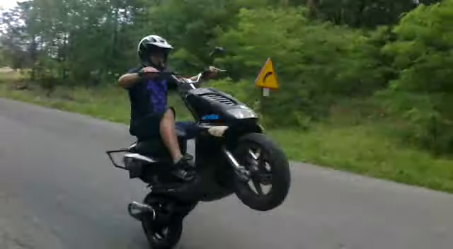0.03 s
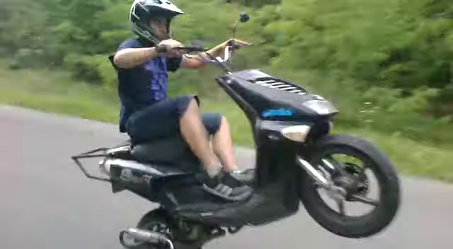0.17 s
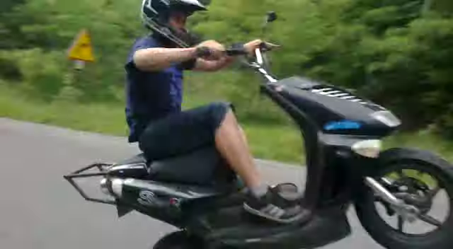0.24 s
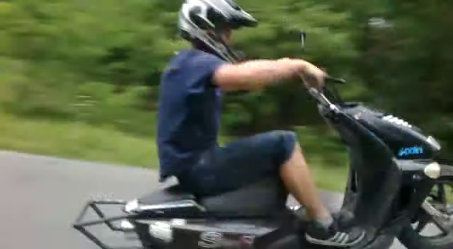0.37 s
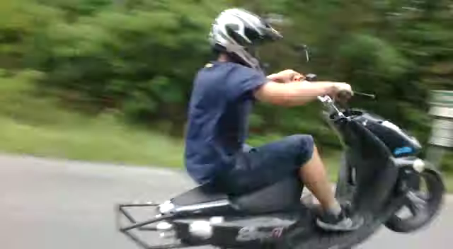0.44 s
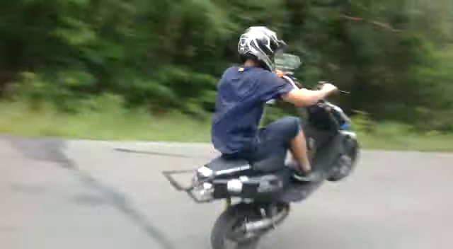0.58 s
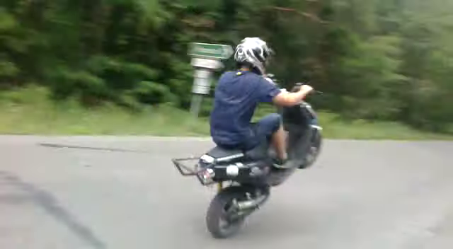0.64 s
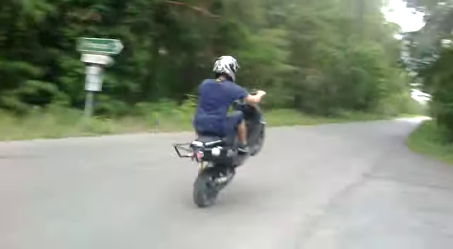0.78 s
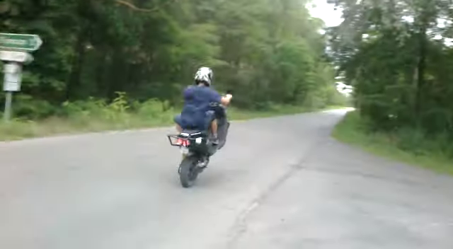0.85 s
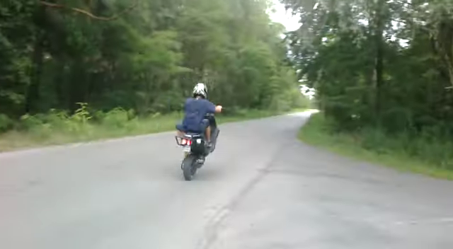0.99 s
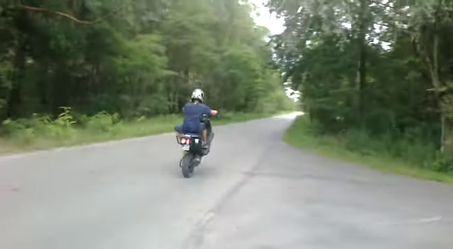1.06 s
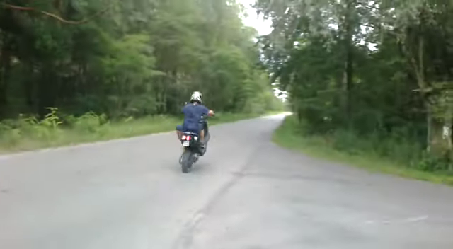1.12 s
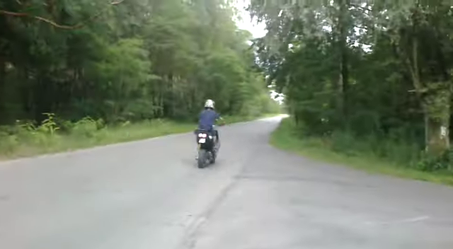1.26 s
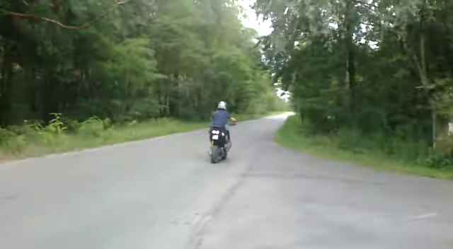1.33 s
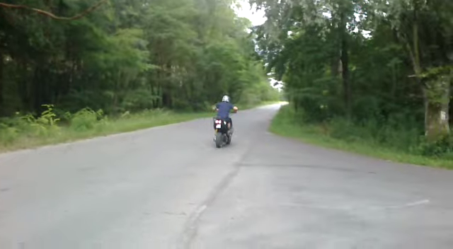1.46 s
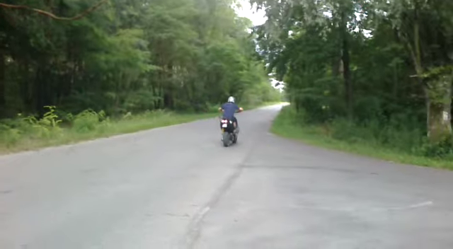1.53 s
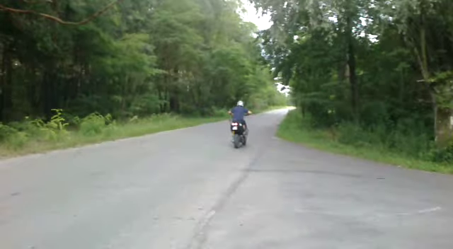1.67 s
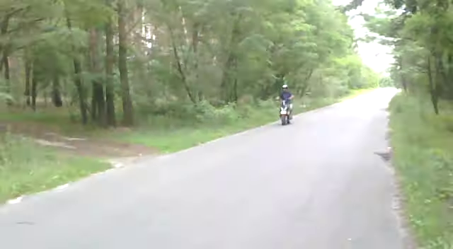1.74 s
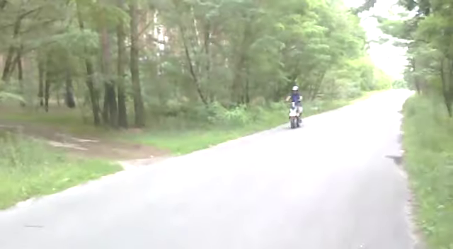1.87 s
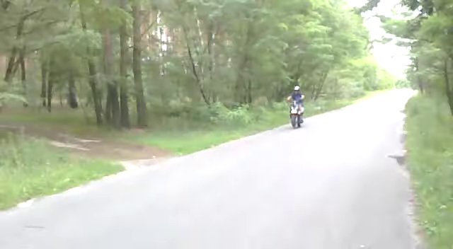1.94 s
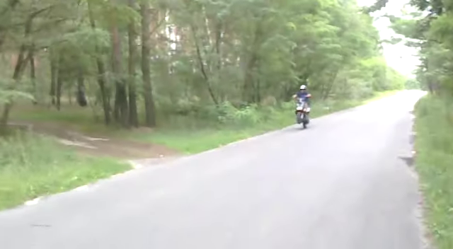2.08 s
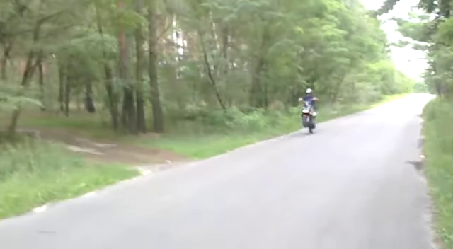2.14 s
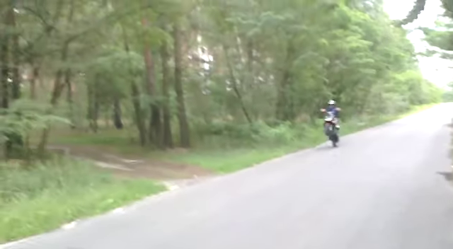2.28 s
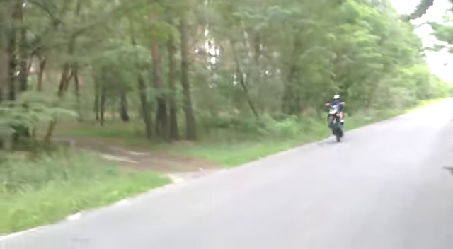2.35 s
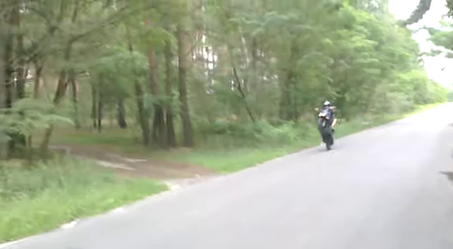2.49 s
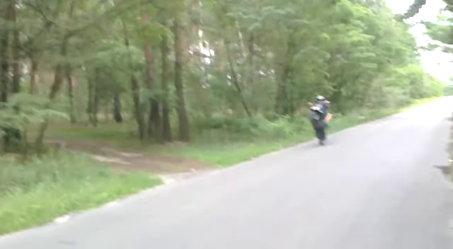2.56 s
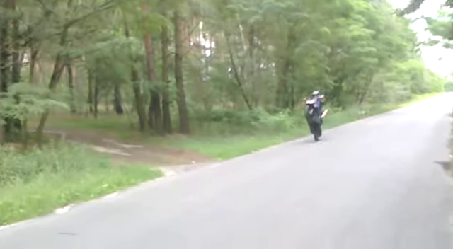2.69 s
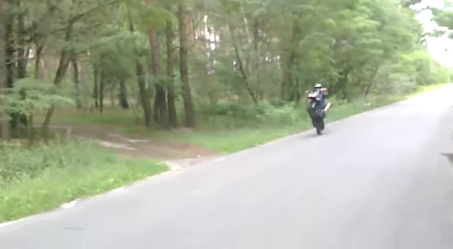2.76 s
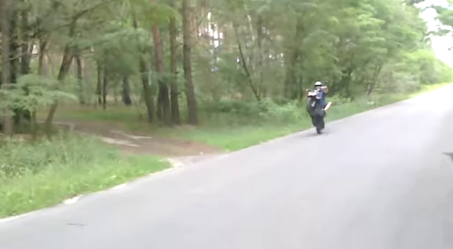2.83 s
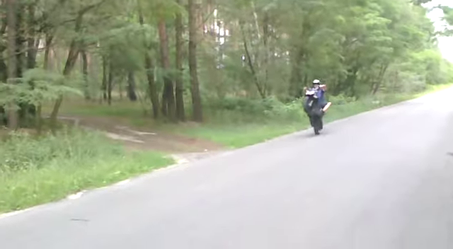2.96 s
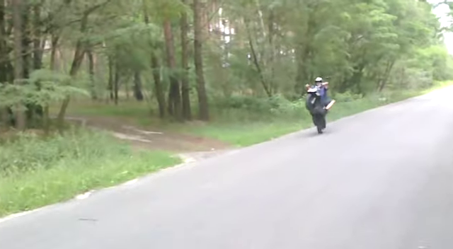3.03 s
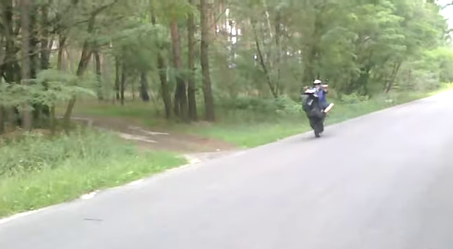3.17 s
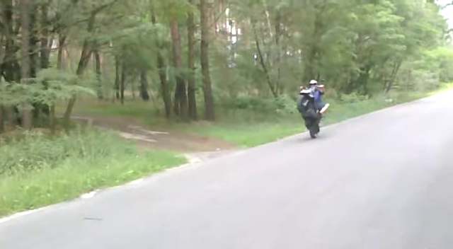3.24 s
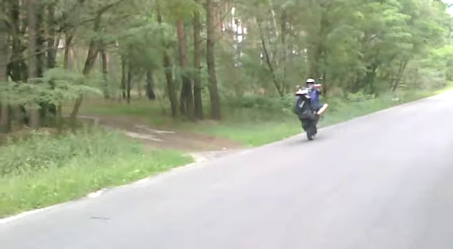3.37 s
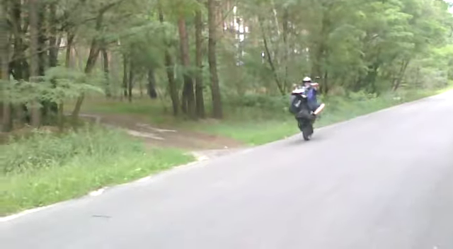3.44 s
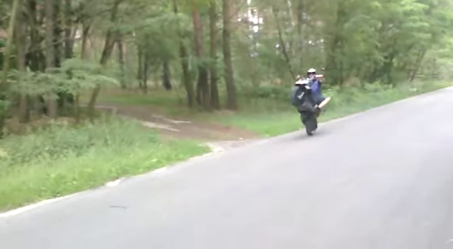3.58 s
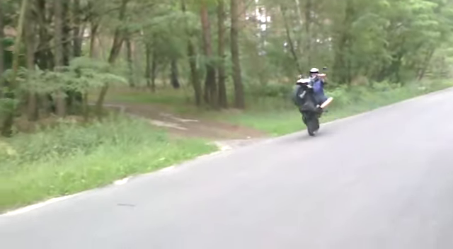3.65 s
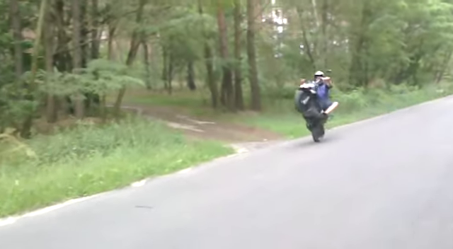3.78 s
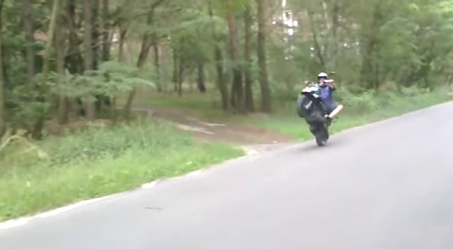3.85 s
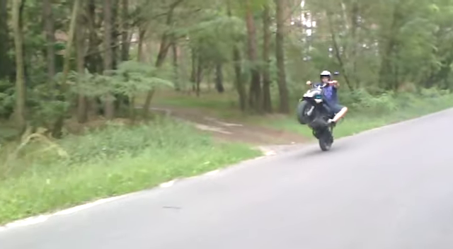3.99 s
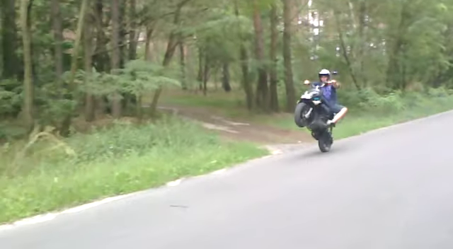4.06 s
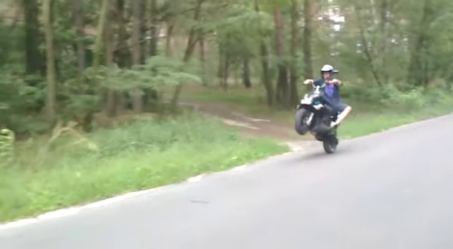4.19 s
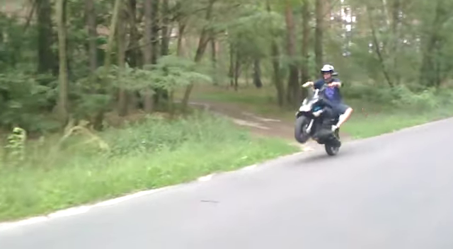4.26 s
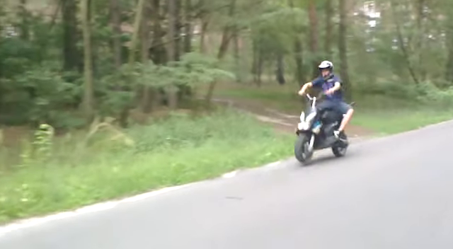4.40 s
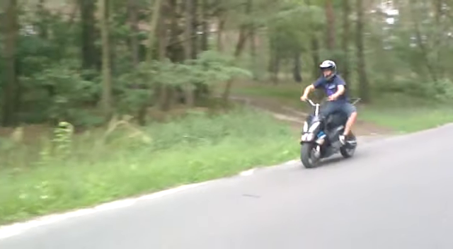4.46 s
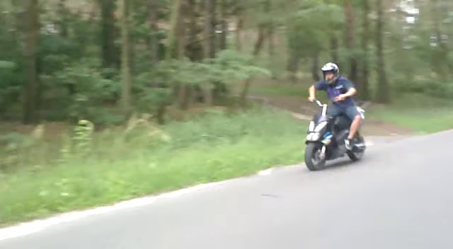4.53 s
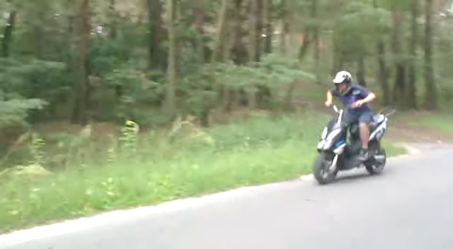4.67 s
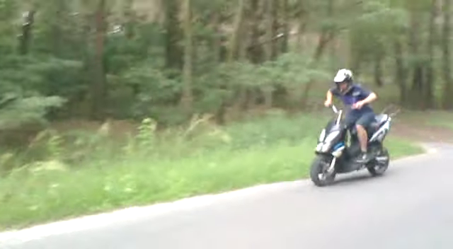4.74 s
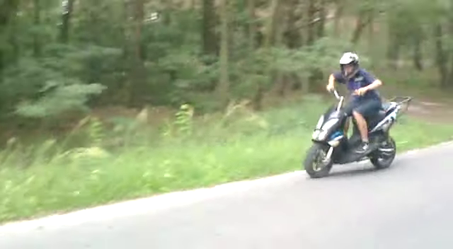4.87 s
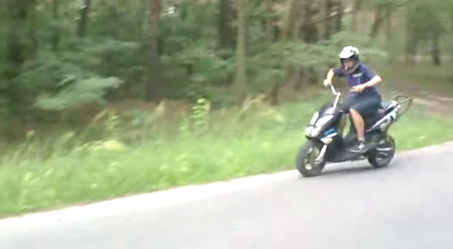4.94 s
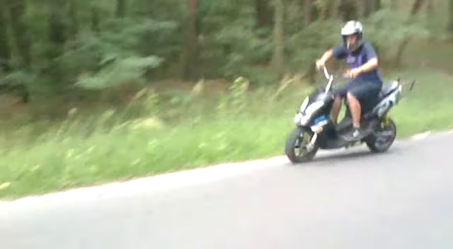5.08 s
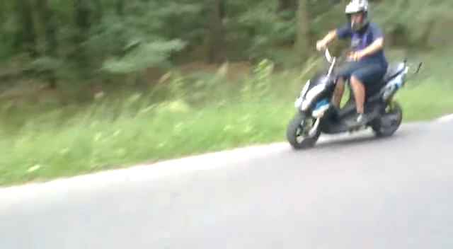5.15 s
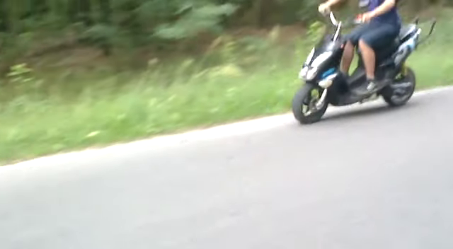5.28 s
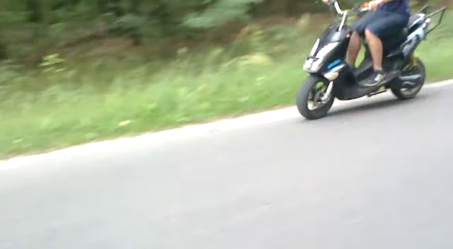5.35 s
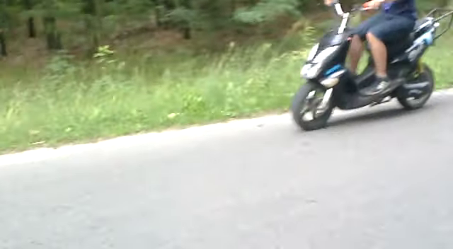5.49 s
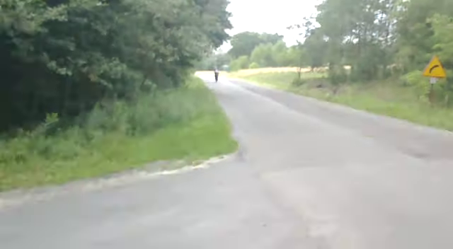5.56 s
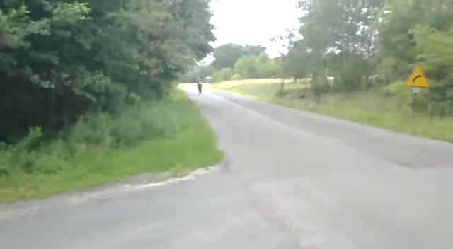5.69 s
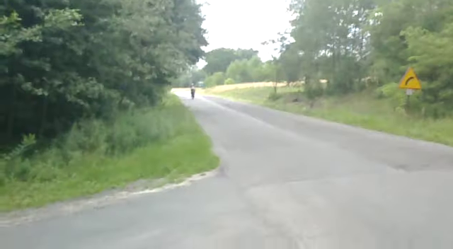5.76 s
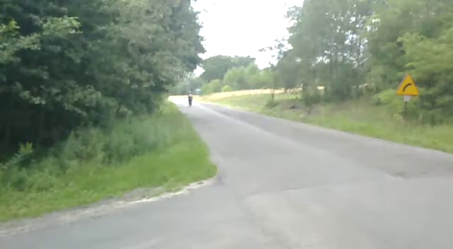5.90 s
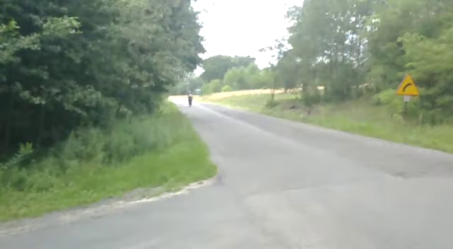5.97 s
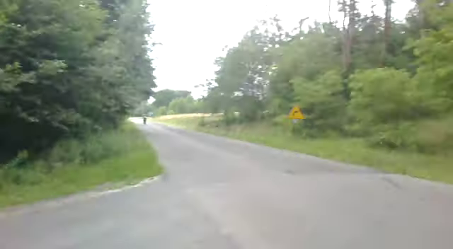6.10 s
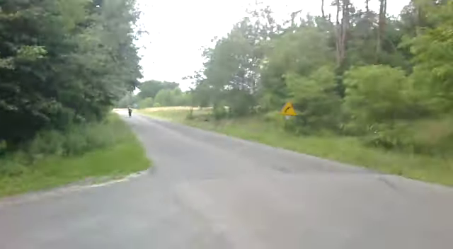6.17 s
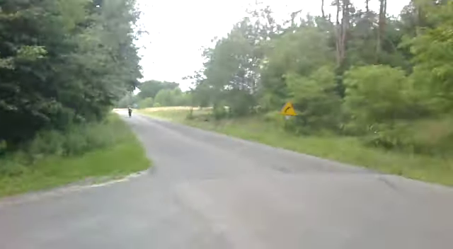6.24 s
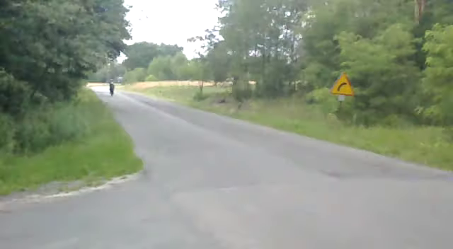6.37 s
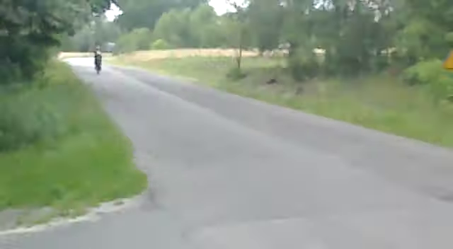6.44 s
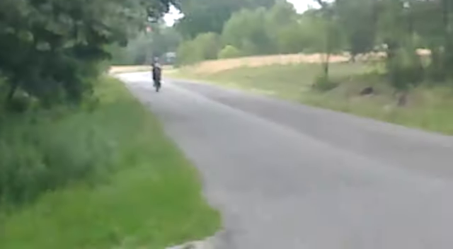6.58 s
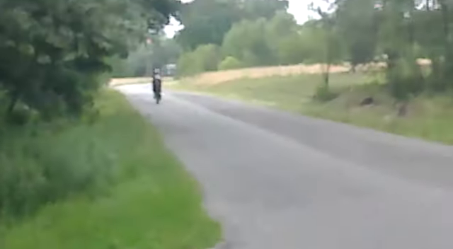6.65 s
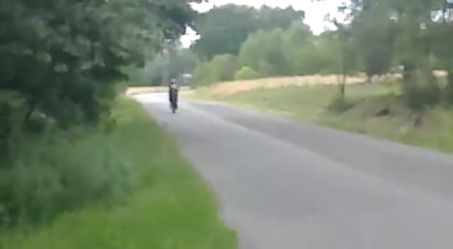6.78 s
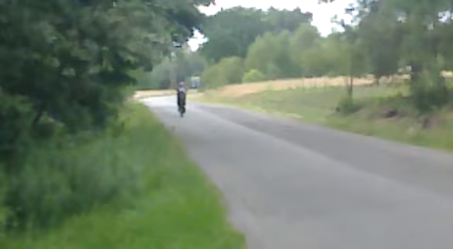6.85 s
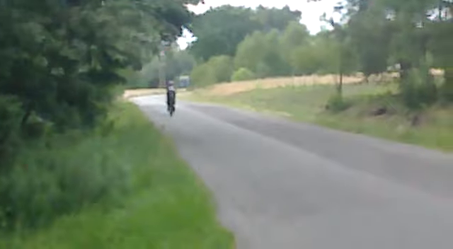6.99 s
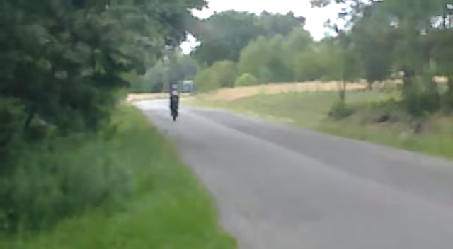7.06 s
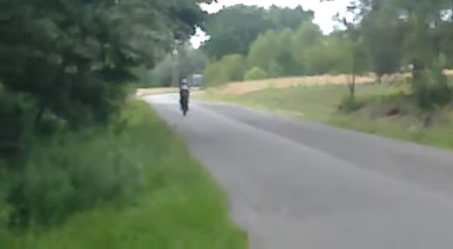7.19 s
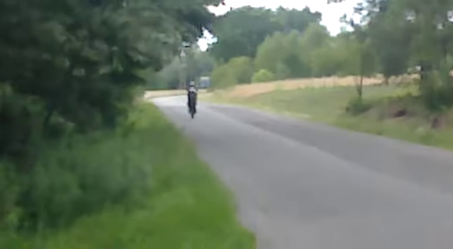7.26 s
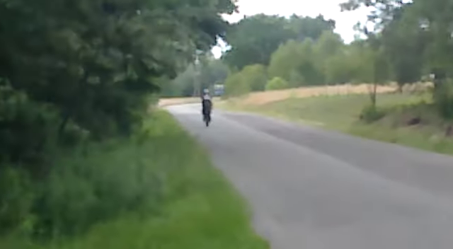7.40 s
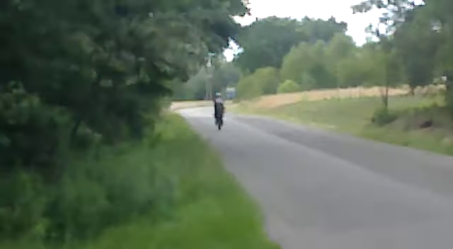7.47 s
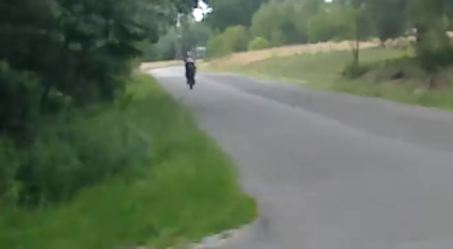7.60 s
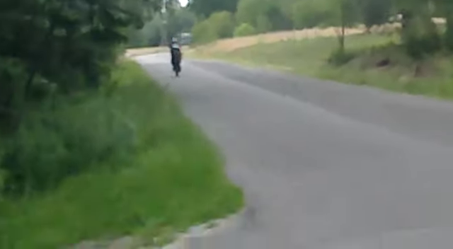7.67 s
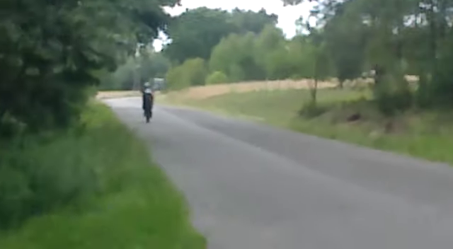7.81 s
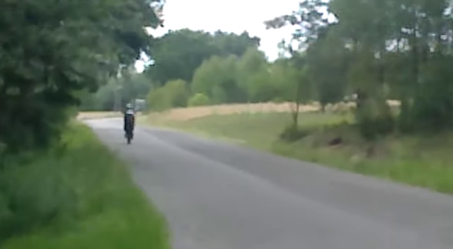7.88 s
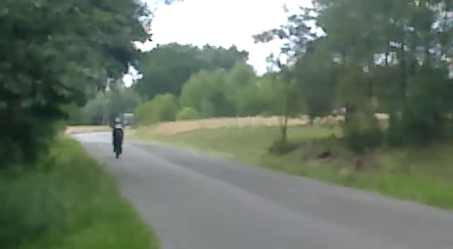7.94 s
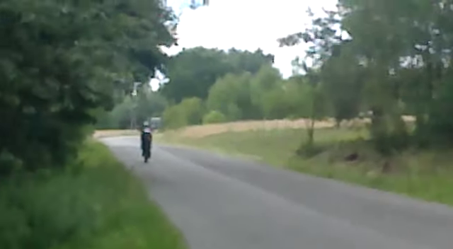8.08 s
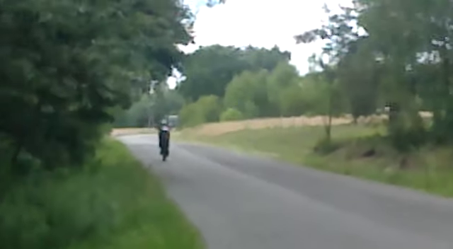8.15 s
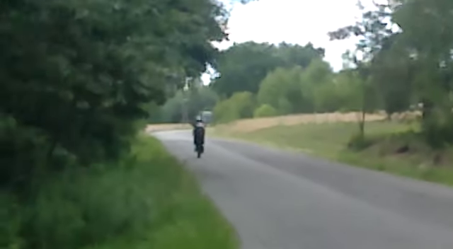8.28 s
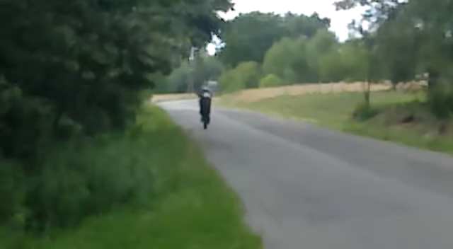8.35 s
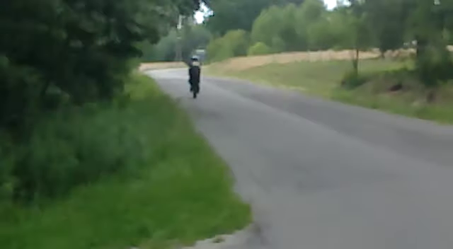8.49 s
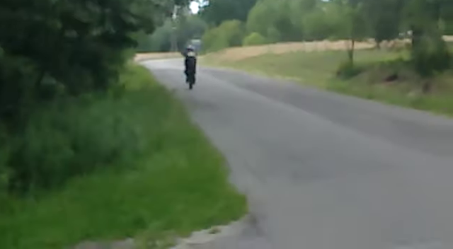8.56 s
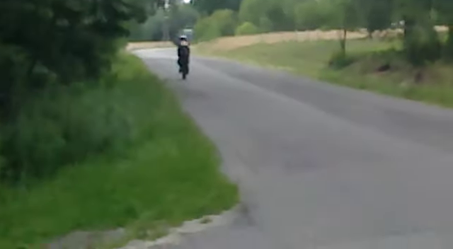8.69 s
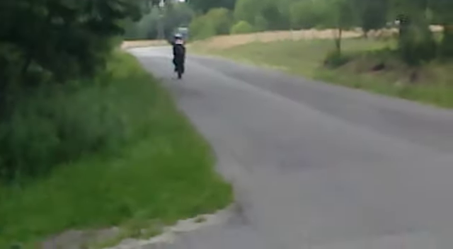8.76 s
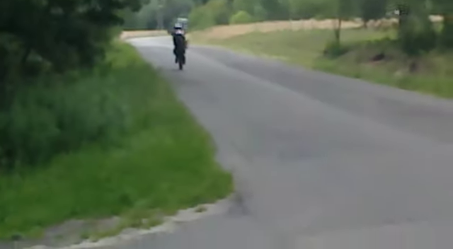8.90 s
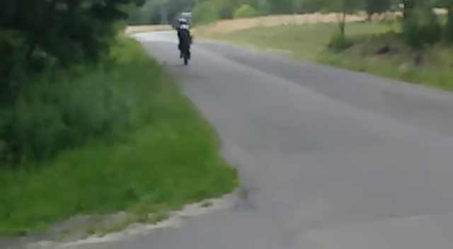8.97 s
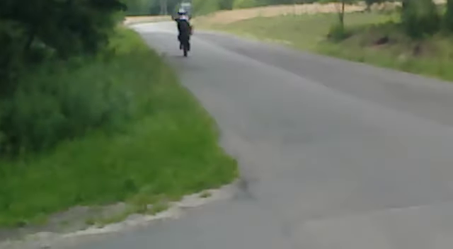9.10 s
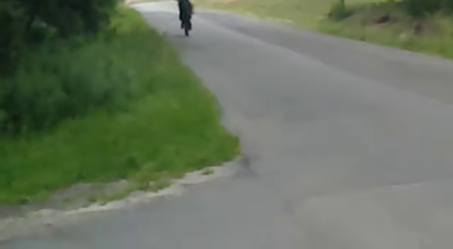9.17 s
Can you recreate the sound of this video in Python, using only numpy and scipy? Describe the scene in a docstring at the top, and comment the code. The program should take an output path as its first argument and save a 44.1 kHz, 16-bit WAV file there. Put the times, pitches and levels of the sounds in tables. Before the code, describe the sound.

Outdoor handheld sound on a forest road, with a thin echo from the trees and light wind rumble. From 0 s a small two-stroke scooter passes close at full throttle, a raspy climbing buzz with hiss and rattle; the throttle shuts near 0.6, then a second, receding pull runs 0.75-1.4, followed by soft puttering and a dull bump at 1.6. Near silence at 1.9-2.1. A long rev climbs to its highest pitch by 2.5, turning ragged, then short barking blips at 2.7, 3.1, 3.6 and 4.1, with loose panels clacking around 4. Rapid sputtering at 4.4-4.7 leads to a sharp backfire at 4.75; the engine coasts up close, popping irregularly and slowing until 5.75. After another short gap, from 5.9 to 9.2 faint, thin revs come in quick bursts from far away, gradually nearing, with stray pops between and bright handling clicks at 6.4.

```python
"""A two-stroke scooter does wheelies on a forest road, in three stretches with a near-silent gap between them.
First it passes close and rides off. Then it comes back blipping the throttle, sputters as the front wheel
comes down, backfires and coasts up close. Last it revs in short bursts far away and draws nearer.
One crank times the engine: open throttle fires the exhaust; puffs and rattle run throughout, with pops when shut.
Filtered noise makes the hiss, wind, knocks and backfire; sine waves make the hum, whine and ringing notes."""
import sys
import numpy as np
from scipy import signal
from scipy.fft import rfft, irfft
from scipy.io import wavfile
from scipy.ndimage import uniform_filter1d

SR = 44100
rng = np.random.default_rng(int(sys.argv[2]) if len(sys.argv) > 2 else 0)


def wav_record(signal):
    """Record a signal, one row per channel, as 16-bit PCM in the file named by sys.argv[1]."""
    frames = np.transpose(np.atleast_2d(signal))
    bounded = np.clip(frames, -1, 1)
    # unit amplitude maps onto the largest positive 16-bit level
    quanta = np.round(bounded * 32767).astype(np.int16)
    wavfile.write(sys.argv[1], SR, quanta)


N = 407022
T = np.arange(N) / SR   # time of each sample [s]

# stretches of sound: (start [s], end [s])
STRETCHES = [(0, 1.903), (2.081, 5.747), (5.92, 9.24)]
# openings of the throttle: (open [s], shut [s], speed at opening [turns/s], top speed [turns/s],
# levelling off [0 = steady climb], exhaust level at opening [dB], exhaust level at shutting [dB])
BLIPS = [(0.0, 0.576, 125.4, 135.6, 1.36, -20.5, -20.0), (0.752, 1.386, 111.0, 130.0, 4.16, -24.0, -32.0),
         (2.072, 2.497, 110.4, 162.0, 1.2, -31.5, -27.5), (2.692, 2.812, 119.6, 128.2, 0.0, -20.5, -25.5),
         (3.084, 3.323, 95.6, 127.0, 0.2, -20.5, -19.7), (3.569, 3.763, 101.3, 127.0, 0.48, -20.0, -19.0),
         (4.067, 4.297, 98.0, 110.0, 0.0, -20.3, -19.7), (6.07, 6.15, 110.2, 111.8, 0.32, -35.5, -40.5),
         (6.231, 6.41, 107.6, 128.4, 0.4, -34.5, -36.5), (6.559, 6.666, 112.6, 122.0, 0.0, -34.5, -38.0),
         (6.845, 7.008, 105.0, 124.4, 0.0, -34.5, -35.5), (7.235, 7.385, 104.6, 119.6, 0.4, -33.0, -37.5),
         (7.606, 7.746, 103.0, 116.0, 1.24, -36.0, -33.5), (7.968, 8.066, 101.8, 112.4, 0.72, -34.5, -35.0),
         (8.397, 8.52, 100.2, 110.8, 2.0, -32.0, -36.5), (8.666, 8.72, 102.6, 107.4, 0.4, -33.5, -35.0),
         (8.88, 9.0, 99.4, 110.4, 0.8, -33.0, -33.0), (9.149, 9.24, 103.6, 112.4, 0.0, -31.5, -35.0)]
# how loud the scooter comes across as it moves and turns, before speed and load act:
# (time [s], hum level [dB], rattle level [dB])
PRESENCE = [(0, -20.5, -29), (.55, -27, -26.5), (.8, -25, -29.5), (1.4, -29.5, -37.5), (1.9, -26.5, -39),
            (2.07, -27.5, -44.5), (2.42, -27.5, -39.5), (2.55, -37, -37.5), (2.65, -27.5, -38.5),
            (3.3, -28.5, -35), (4.3, -29, -35), (4.9, -26.5, -36.5), (5.7, -26, -31.5), (5.91, -44, -46.5),
            (6.4, -43, -43.5), (8.6, -43.5, -43), (8.8, -45, -36.5)]
# exhaust colour with the silencer facing the listener: (frequency [Hz], relative level [dB])
PIPE_FACING = [(200, -27), (300, -10.5), (430, -25.5), (500, -22), (620, -4.5), (730, 1.5), (830, 3),
               (950, -11.5), (1220, -22), (1520, -7.5), (1900, -23), (2250, -22), (3500, -35.5),
               (7000, -46.5)]
# exhaust colour from far away: (frequency [Hz], relative level [dB])
PIPE_FAR = [(230, 8), (350, -4.5), (450, 0.5), (540, -14), (660, 10.5), (760, 11), (960, 12.5), (1220, -9),
            (1560, 8), (1900, 9.5), (2080, 8), (2280, -26), (3600, -22), (7000, -48)]
CRUISE_TURNS_PER_S = 110   # speed at which rattle and pumping have their plain level
CLOSE_S = 4.66   # from here the scooter rolls up close


def from_db(db):
    """Decibels to gain."""
    return 10 ** (np.asarray(db) / 20)


def in_time(rows):
    """Each column of a curve, sample by sample."""
    s, *columns = np.transpose(rows)
    return [np.interp(T, s, c) for c in columns]


def rms_one(x):
    """Scale to unit power."""
    return x / np.sqrt(np.mean(x ** 2) + 1e-20)


def drift(per_s):
    """Smooth random wandering of unit power, with so many new values per second."""
    knots = rng.standard_normal(int(N / SR * 400))
    return rms_one(np.interp(T * per_s, np.arange(len(knots)), knots))


def gate(start, end, rise, fall):
    """One between two times, with straight ramps outside them."""
    return np.clip((T - start) / rise + 1, 0, 1) * np.clip((end - T) / fall + 1, 0, 1)


def resonate(x, spectrum, size=4096):
    """Causal filter of unit energy with the given colour; it falls steeply beyond both ends."""
    hz, db = np.transpose(spectrum)
    octave = np.log2(np.maximum(np.fft.rfftfreq(size, 1 / SR), 1))
    knots = np.log2(hz)
    beyond = abs(octave - np.clip(octave, knots[0], knots[-1]))
    shape = np.interp(octave, knots, db) - 20 * np.minimum(beyond, 2)
    # folding the cepstrum makes the filter respond as early as it can (minimum phase)
    cepstrum = irfft(np.log(from_db(shape)))
    cepstrum[1:size // 2] *= 2
    cepstrum[size // 2 + 1:] = 0
    response = irfft(np.exp(rfft(cepstrum)))
    return signal.oaconvolve(x, response / np.linalg.norm(response))[:N]


def by_view(x, views):
    """Each span of time gets the colour of the side that faces the listener."""
    view = np.searchsorted([s for s, _ in views], T, side="right") - 1
    return sum(resonate(x * (view == k), colour) for k, (_, colour) in enumerate(views))


def clicks(at, sizes):
    """Impulses at fractional sample positions, shared between the two nearest samples."""
    out, at = np.zeros(N), np.clip(at, 0, N - 2)
    whole = at.astype(int)
    np.add.at(out, whole, sizes * (1 - at % 1))
    np.add.at(out, whole + 1, sizes * (at % 1))
    return out


def puff(pulses, turbulence, decay_s):
    """Each pressure pulse drags a short jet of turbulent gas behind it."""
    r = np.exp(-2 / (decay_s * SR))
    jet = np.sqrt(signal.lfilter([1 - r], [1, -r], pulses ** 2 + 1e-18))
    return pulses + turbulence * jet * rng.standard_normal(N)


def reflect(x, share, delay_s):
    """A wave runs to and fro in the expansion chamber: the pulse is spread, its colour kept."""
    gap = np.zeros(max(int(delay_s * SR), 1))
    return signal.lfilter(np.r_[-share, gap, 1], np.r_[1, gap, -share], x)


def crank_speed():
    """Speed climbs with the throttle open, sinks towards the next opening once shut, and drifts while rolling."""
    # crank speed while rolling with the throttle shut: (time [s], speed [turns/s])
    rolling = [(1.5, 114), (1.66, 102), (1.9, 101.4), (4.43, 95.3), (4.65, 94.5), (4.76, 91.3),
               (5.15, 89.5), (5.42, 85.3), (5.63, 80.8), (5.749, 75.5), (5.91, 114), (6.05, 109)]
    # the crank pulls on briefly after shutting, then sinks; the flywheel rounds every change
    overrun_s, sink_s, flywheel_s = .017, .11, .035
    # legs: (start [s], speed [turns/s], settling rate [1/s])
    legs = [(on, low, bend / (off - on)) for on, off, low, _, bend, *_ in BLIPS]
    legs += [(off + overrun_s, top, 1 / sink_s) for _, off, _, top, *_ in BLIPS]
    legs += [(s, speed, 0) for s, speed in rolling]
    s, speed, rate = np.transpose(sorted(legs))
    bend, number = rate * np.r_[np.diff(s), 1] + 1e-6, np.arange(len(s))
    place = np.interp(T, s, number)
    leg = place.astype(int)
    # within a leg the speed changes fast at first, then levels off
    eased = leg + np.expm1(-bend[leg] * (place - leg)) / np.expm1(-bend[leg])
    return uniform_filter1d(np.interp(eased, number, speed), int(flywheel_s * SR), mode="nearest")


def engine_load():
    """One while the engine pulls, zero while it coasts; it builds quickly and lets go more slowly."""
    rise_s, fall_s = 0.024, 0.046
    return np.minimum(sum(gate(on + rise_s, off, rise_s, fall_s) for on, off, *_ in BLIPS), 1)


def from_opening(turns):
    """Turns counted so that each opening of the throttle begins with a firing."""
    at = [int(on * SR) for on, *_ in BLIPS]
    slip = np.diff(-turns[at], prepend=0) % 1
    return turns + np.cumsum(clicks(np.array(at) - SR / 50, slip))


def strokes(turns, uneven_db, jitter_s, turbulence):
    """One pulse each time the exhaust port opens, no two alike; even power at any speed."""
    at = np.interp(np.arange(1, int(turns[-1])), turns, np.arange(N))
    chance = rng.standard_normal((1200, 2))[:len(at)]
    sizes = np.sqrt(np.gradient(at)) * from_db(uneven_db * chance[:, 0])
    pulses = clicks(at + jitter_s * SR * chance[:, 1], sizes)
    return rms_one(puff(pulses, turbulence, decay_s=0.018))


def exhaust(turns, speed, far, turbulence=0.13, far_turbulence=0.076):
    """Firing under open throttle; its colour changes as the scooter turns and changes distance."""
    # exhaust colours, by where the silencer points: (frequency [Hz], relative level [dB])
    pipe_passing = [(330, -11.5), (511, -2), (659, -1.5), (900, -1), (1180, -2), (1340, -3), (1700, -0.5),
                    (2100, -11.5), (2440, -16.5), (6000, -29), (15000, -29.5)]
    pipe_leaving = [(260, 2.5), (390, 18.5), (530, 0), (744, -4), (880, -9), (1100, 6.5), (1600, 6),
                    (2190, 2.5), (2600, -2), (6000, -15)]
    pipe_turning = [(260, -21.5), (340, 14), (450, 6.5), (600, 12.5), (850, 17), (1100, 8.5), (1550, 9),
                    (1820, 8.5), (2200, 6.5), (5000, -30)]
    pipe_nearing = [(210, 8), (320, 5), (480, -15), (640, 7.5), (760, 13.5), (950, 11), (1220, -13),
                    (1560, 10.5), (2050, 6), (2300, -22), (7000, -46)]
    # (start [s], colour, share reflected in the pipe)
    views = [(0, pipe_passing, 0.28), (.7, pipe_leaving, 0.53), (2, pipe_turning, 0.69),
             (2.62, PIPE_FACING, 0.071), (5.8, PIPE_FAR, 0.23), (7.9, pipe_nearing, 0.12)]
    opened = [gate(on, off, rise=0.005, fall=0.026) for on, off, *_ in BLIPS]
    drive = sum(g * from_db(np.interp(T, row[:2], row[-2:])) for g, row in zip(opened, BLIPS))
    # above 134 turns per second the firing grows raspier
    rasp = np.where(far, far_turbulence, turbulence) + .04 * np.maximum(speed - 134, 0)
    firing = drive * strokes(from_opening(turns), uneven_db=.7, jitter_s=.00001, turbulence=rasp)
    view = np.searchsorted([v[0] for v in views], T, side="right") - 1
    pipe = 0
    for k, (_, colour, share) in enumerate(views):
        pipe = pipe + resonate(reflect(firing * (view == k), share, delay_s=0.002083), colour)
    return pipe + bark(turns, speed) + snarl(turns, speed) + roar(turns)


def ringing_orders(turns, speed, hz, width_hz, offsets):
    """Tones at whole multiples of the crank speed, from the third up, strongest near a resonance."""
    orders = 3 + np.arange(len(offsets))[:, None]
    gains = 1 / (1 + ((orders * speed - hz) / width_hz) ** 2)
    tones = gains * np.sin(2 * np.pi * (orders * turns + offsets))
    return rms_one(np.sum(tones, axis=0) / np.linalg.norm(gains, axis=0))


def bark(turns, speed, width_hz=110):
    """Each engine order swells as the wandering pipe resonance crosses it during a long pull."""
    # a low pipe resonance wanders through the three long pulls: (time [s], frequency [Hz], level [dB])
    wandering = [(0, 1040, -28.5), (.27, 954, -18), (.39, 704, -17), (.58, 665, -21.5), (.75, 580, -24.5),
                 (.96, 880, -34.5), (1.39, 904, -32.5), (2.07, 464, -30), (2.25, 550, -28),
                 (2.4, 634, -26.5), (2.5, 800, -36)]
    out = np.zeros(N)
    opened = sum(gate(on, off, rise=0.004, fall=0.02) for on, off, *_ in BLIPS[:3])
    pull, (centre, db) = opened > 0, in_time(wandering)
    out[pull] = ringing_orders(turns[pull], speed[pull], centre[pull], width_hz, rng.random((9, 1)))
    return opened * from_db(db) * out


def snarl(turns, speed, width_hz=70):
    """With the throttle open, the orders nearest a narrow resonance swell and fade."""
    # brief flares: (time [s], length [s], centre frequency [Hz], level [dB])
    flares = [(0.037, 0.15, 1730, -19.5), (.23, 0.05, 1570, -23), (0.314, 0.038, 1725, -16.5),
              (0.32, 0.14, 1310, -28), (0.45, 0.083, 1937, -21), (.52, .05, 2350, -26),
              (.54, .05, 405, -23), (0.57, 0.026, 1663, -13), (0.772, 0.033, 1610, -24),
              (0.847, 0.06, 1330, -25.5), (0.865, 0.068, 1540, -21), (1.146, 0.11, 1570, -31),
              (1.2, 0.1, 1810, -38), (1.15, 0.13, 2450, -41), (2.113, 0.19, 1540, -26),
              (2.14, 0.072, 375, -24.5), (2.26, 0.21, 840, -29), (2.465, .045, 2230, -30.5),
              (6.331, .05, 1880, -35), (6.945, 0.035, 1890, -36), (7.36, .035, 1870, -34)]
    out, offsets = np.zeros(N), rng.random((16, 1))
    for s, length, hz, db in flares:
        near = abs(T - s) < 2 * length
        tone = ringing_orders(turns[near], speed[near], hz, width_hz, offsets)
        out[near] += from_db(db) * np.exp(-((T[near] - s) / length) ** 2) * tone
    return out * sum(gate(on, off, rise=0.004, fall=0.028) for on, off, *_ in BLIPS)


def pumping(turns, speed, far, whine_db=1.0):
    """Weak puffs on every turn, under the firing and alone when the throttle is shut; the drive whines."""
    # colour of the pumping from behind, then from the front: (frequency [Hz], relative level [dB])
    pipe_behind = [(220, -4.5), (330, 1), (450, -5), (690, 3), (900, -1), (1100, -20.5), (1500, 5),
                   (1900, -13.5), (2400, -23), (5000, -25.5)]
    pipe_front = [(200, -23.5), (290, -4), (440, -13), (560, -0.5), (780, 5), (1100, -21), (1530, -1),
                  (1950, -24), (2270, -10.5), (2600, -31.5), (2900, -12.5), (5000, -23.5)]
    # the drive whines at one multiple of the crank speed after the long pulls and at another on rolling up:
    # (start [s], end [s], order [per turn], level before whine_db, against the pumping [dB])
    whines = [(0.58, 0.75, 7, 3), (1.1, 1.91, 7, -3), (2.52, 2.95, 7, -1), (4.76, 5.3, 8, -2)]
    close, behind = (T > CLOSE_S) & ~far, T < STRETCHES[1][0]
    rattle_db = in_time(PRESENCE)[1]
    level = from_db(rattle_db - 0.5 + 7 * np.log2(speed / CRUISE_TURNS_PER_S))   # +7 dB per octave of speed
    view_gain = from_db(3.5 * close - 3 * behind)
    puffs = level * view_gain * strokes(turns, uneven_db=1.2, jitter_s=.00002, turbulence=.5)
    puffs = reflect(puffs, 0.72, delay_s=0.001333)
    whine = sum(gate(on, off, .03, 0.058) * from_db(db) * np.sin(2 * np.pi * turns * order)
                for on, off, order, db in whines)
    whine = whine * level * from_db(whine_db + 3.7 * drift(20))
    near_puffs = by_view(puffs * ~far, [(0, pipe_behind), (2, pipe_front)])
    return near_puffs + from_db(-7.5) * resonate(puffs * far, PIPE_FAR) + whine


def rattle(turns, repeat=0.4):
    """Metal parts clatter alike on every turn; rushing air adds a hiss that never repeats."""
    clatter = rng.standard_normal(SR // 80) * np.exp(-T[:SR // 80] / 0.077)
    blows = strokes(turns, uneven_db=3.0, jitter_s=.000008, turbulence=0.045)
    regular = rms_one(signal.oaconvolve(blows, clatter)[:N])
    rush = rms_one(from_db(np.cos(2 * np.pi * turns) + drift(260)) * rng.standard_normal(N))
    return np.sqrt(repeat) * regular + np.sqrt(1 - repeat) * rush


def road(x):
    """On the first pass an echo off the asphalt combs the rattle; its lag shrinks with distance."""
    pass_s, pass_length_s, longest_lag_s = .45, .45, 0.001137
    lag = longest_lag_s / np.hypot(1, (T - pass_s) / pass_length_s)
    share = 0.11 * (T < STRETCHES[1][0])
    return (x + share * np.interp(T - lag, T, x)) / np.hypot(1, share)


def body(turns, speed, far):
    """The two lowest orders hum cleanly; rattle and hiss change colour with distance. All follow speed and load."""
    # the silencer favours the two lowest orders at certain speeds:
    # (speed [turns/s], gain of first order [dB], gain of second order [dB])
    hum_gains = [(77.3, -15, -3.5), (89, -17, -11), (100.4, -13.5, -15), (113.3, -9.5, -9), (122, -5.5, -9),
                 (133, 0.5, -10.5), (161, 1, -7)]
    # hiss of intake, belt and fan: near, far off, and the rasp on drawing near again:
    # (frequency [Hz], relative level [dB])
    hiss_near = [(150, -2), (500, -9.5), (1200, 0.5), (2400, -0.5), (4000, -3.5), (5200, -5), (6500, -12),
                 (8000, -16.5), (10000, -17.5), (12500, -26.5), (17000, -35.5)]
    hiss_far = [(150, 3.5), (500, 1.5), (800, 15), (1200, 9), (1900, 16), (2300, 3.5), (2700, 6),
                (3100, -3.5), (4400, -12), (6200, -17.5), (10000, -19.5), (16000, -51)]
    hiss_nearing = [(500, 4.5), (1200, 2), (1900, 12.5), (2800, -6), (3500, 3.5), (4300, -6), (5300, -7),
                    (6100, -23), (7500, -20.5), (16000, -38)]
    (hum_db, rattle_db), load = in_time(PRESENCE), engine_load()
    speeds, *orders_db = np.transpose(hum_gains)
    first_db, second_db = (hum_db + np.interp(speed, speeds, db) for db in orders_db)
    angle = 2 * np.pi * turns
    first = from_db(first_db + 2 * load) * np.sin(angle)
    second = from_db(second_db + 9.5 * load) * np.sin(2 * angle)
    hum = np.sqrt(2) * (first + second)
    clatter = rattle(turns)
    # +4 dB under load, +14.5 dB per octave of speed
    hiss_db = rattle_db + 4 * load + 14.5 * np.log2(speed / CRUISE_TURNS_PER_S)
    hiss = from_db(hiss_db) * clatter
    nearing = np.clip((T - 8.6) / 0.3, 0, 1)
    distant = resonate(hiss * far * (1 - nearing), hiss_far) + resonate(hiss * nearing, hiss_nearing)
    return hum + road(resonate(hiss * ~far, hiss_near)) + distant + far * casing(clatter, load, nearing)


def wind(gust_db=3):
    """Lumpy rumble on the microphone: a steady breeze with gusts, both wavering in level."""
    # gusts: (time [s], level before wavering [dB], length [s])
    gusts = [(.25, -39, 0.093), (.56, -34, 0.08), (4.79, -35, 0.11), (5.254, -44, 0.4),
             (5.682, -33.5, 0.062), (7.767, -49, 0.037)]
    colour = [(20, -5.0), (50, -1.5), (90, 0.0), (200, -1.0), (500, -14.0)]   # (frequency [Hz], level [dB])
    rumble = resonate(rng.standard_normal(N), colour)
    flow = from_db(-53)   # the steady breeze
    for s, db, length in gusts:
        flow = flow + from_db(db) * np.exp(-np.minimum(((T - s) / length) ** 2, 20))
    return flow * from_db(gust_db * drift(21)) * rumble


def forest(x, wet_db=-14, t60=0.32, dull_hz=3500):
    """Tree trunks scatter a thin, dull echo: sparse random reflections that die away."""
    age = T[:SR]
    hits = rng.standard_normal(SR) * (rng.random(SR) < .05)
    trunks = hits * from_db(-60 * age / t60) * (age > .012)
    echo = signal.sosfilt(signal.butter(1, dull_hz, fs=SR, output="sos"), trunks / np.linalg.norm(trunks))
    return x + from_db(wet_db) * signal.oaconvolve(x, echo)[:N]


def handling():
    """Short dull bumps and bright ticks on the camera: bands of noise that die away."""
    # knocks and rubs on the camera body: (time [s], level [dB], decay [s], centre frequency [Hz])
    knocks = [(1.634, -32.5, 0.046, 4420), (1.634, -32, 0.037, 700), (1.641, -21.5, 0.015, 205),
              (6.3841, -16, 0.00092, 6600), (6.392, -22, 0.00073, 6960), (6.385, -42.5, 0.068, 4200),
              (6.391, -33, 0.16, 733), (7.727, -34, .02, 170)]
    out, noise = np.zeros(N), rng.standard_normal(N)
    for s, db, decay, hz in knocks:
        band = signal.butter(4, [hz / 2, min(hz * 1.51, SR * .45)], "band", fs=SR, output="sos")
        envelope = (T > s) * np.exp(-np.clip((T - s) / decay, 0, 20))
        out += from_db(db) * envelope * rms_one(signal.sosfilt(band, noise))
    return out


def roar(turns):
    """Partway up the highest rev the firings turn ragged and turbulent for a moment."""
    # the moment of the roar: (time [s], length [s], level [dB])
    moment = (2.378, 0.045, -23)
    # colour of the roar: (frequency [Hz], relative level [dB])
    colour = [(300, -2), (600, -3), (900, -6), (1400, -0.5), (1800, -11), (2600, -16)]
    s, length, db = moment
    ragged = strokes(turns, uneven_db=2.5, jitter_s=.00015, turbulence=1.2)
    swell = np.exp(-np.minimum(((T - s) / length) ** 2, 20))
    return from_db(db) * resonate(ragged * swell, colour)


def pops(speed, far):
    """Unburnt mixture gathers and lights, then again a turn later; up close the pulses spread in the pipe."""
    # stray firings with the throttle shut: (time [s], level [dB])
    stray = [(3.044, -32.5), (3.531, -24.5), (4.016, -25), (4.385, -30.5), (4.478, -23.5), (4.521, -23.5),
             (4.542, -26), (4.574, -22), (4.607, -25.5), (4.627, -32), (4.693, -30.5), (5.015, -27),
             (5.116, -25.5), (5.195, -23.5), (5.309, -24), (5.404, -24.5), (5.474, -25), (5.547, -29),
             (5.61, -27), (5.623, -24.5), (5.976, -38), (6.029, -36), (7.2, -39), (7.578, -38), (7.84, -42),
             (7.935, -37.5), (8.142, -37.5), (8.248, -36.5), (8.303, -35.5), (8.348, -35), (8.603, -40),
             (8.8, -42)]
    # colour of the sputters as the front wheel comes down: (frequency [Hz], relative level [dB])
    pipe_sputtering = [(170, 4), (280, 3.5), (450, -14), (680, 5), (850, 7.5), (1120, -15.5), (1570, 4),
                       (1950, -12.5), (2200, -4.5), (2600, -18), (3500, -12.5), (8000, -32)]
    # colour of a close pop: (frequency [Hz], relative level [dB])
    pipe_popping = [(80, 0), (170, 8.5), (300, -2), (470, -10.5), (800, 6.5), (1130, -13), (1560, 6),
                    (1950, -7.5), (2300, -3.5), (3000, -13.5), (3550, -6), (8000, -31.5)]
    s, db = np.transpose(stray)
    rate = np.interp(s, T, speed)
    period = SR / rate   # samples per turn
    # the second firing is as strong as the first, but weak once the engine is nearly idle
    next_db = db + np.where(rate < 92, -13, 0)
    pulses = clicks(s * SR, from_db(db) * np.sqrt(period))
    pulses += clicks(s * SR + period, from_db(next_db) * np.sqrt(period))
    gas = puff(pulses, turbulence=1.0, decay_s=0.0093)
    close = (T > CLOSE_S) & ~far
    gas = gas * ~close + reflect(gas * close, 0.71, delay_s=.0009)
    views = [(0, PIPE_FACING), (4.45, pipe_sputtering), (CLOSE_S, pipe_popping), (STRETCHES[2][0], PIPE_FAR)]
    return by_view(gas, views)


def clacks(decay_s=0.016):
    """Loose panels knock as the scooter jolts: short bursts of noise coloured by what rings."""
    # clacks of loose bodywork: (time [s], level [dB])
    jolts = [(3.966, -30), (4.036, -31.5), (4.068, -29), (4.098, -29), (4.243, -31), (5.625, -29.5)]
    # what the bodywork rings with: (frequency [Hz], relative level [dB])
    panels = [(2400, -28.5), (2900, 8), (3200, -10.5), (3550, 5), (4200, -5), (4900, 1), (6000, -12),
              (10000, -20)]
    blows = sum(from_db(db) * (T > s) * np.exp(-np.clip((T - s) / decay_s, 0, 20)) for s, db in jolts)
    return resonate(blows * rng.standard_normal(N), panels)


def backfire(crack_s=0.0049, tail_db=-14, tail_s=0.082):
    """A sharp blast of noise, the boom of the silencer and a fading roar."""
    # backfire in the silencer: (time [s], level of the blast [dB])
    firing = (4.744, -4)
    # colour of the blast: (frequency [Hz], relative level [dB])
    bang = [(60, -9), (330, -0.5), (480, -20), (651, 3), (1140, -13.5), (1500, -4), (4860, -12),
            (16000, -37.5)]
    # booming of the silencer: (frequency [Hz], level [dB], decay [s])
    booms = [(308, -15.5, 0.013), (666, -14, .011)]
    s, db = firing
    age = np.maximum(T - s, 0)
    fading = np.exp(-age / crack_s) + from_db(tail_db) * np.exp(-age / tail_s)
    blast = np.minimum(age / 0.0031, 1) * fading
    boom = sum(from_db(level_db) * np.exp(-np.minimum(age / decay, 20)) * np.sin(2 * np.pi * hz * age)
               for hz, level_db, decay in booms)
    return from_db(db) * resonate(blast * rng.standard_normal(N), bang) + boom


def casing(clatter, load, nearing):
    """The clatter makes the engine casing ring in narrow bands, which shift in level on the approach."""
    # ringing bands, levels before the swell:
    # (frequency [Hz], width [Hz], level far off [dB], level drawing near [dB])
    bands = [(3590, 280, -45, -42), (4500, 140, -55, -60), (5020, 400, -70, -40), (6800, 510, -89, -51)]
    out = 0
    for hz, width_hz, far_db, near_db in bands:
        band = signal.butter(2, [hz - width_hz / 2, hz + width_hz / 2], "band", fs=SR, output="sos")
        gain = from_db(far_db) * (1 - nearing) + from_db(near_db) * nearing
        out = out + gain * rms_one(signal.sosfilt(band, clatter))
    # it swells late in every rev, and is stronger once the scooter is out of the bend (6.97 s)
    swell = np.interp(T - .05, T, uniform_filter1d(load, SR // 12))
    in_view = np.clip((T - 6.97) / .1 + 1, .35, 1)
    return out * in_view * from_db(10 * (swell - 1.5))


def scene(wobble=.002):
    """The crank drives the engine layers; only a faint noise floor is left between the stretches."""
    speed = crank_speed() * (1 + wobble * drift(35))
    turns, far = np.cumsum(speed) / SR, T > STRETCHES[1][1]
    pipe = exhaust(turns, speed, far) + pumping(turns, speed, far) + pops(speed, far) + clacks() + backfire()
    # far away the echo of the trees is stronger against the direct sound
    far_wet_db = -8
    distant = forest(pipe * far, wet_db=far_wet_db, t60=0.065) / np.hypot(1, from_db(far_wet_db))
    outdoors = forest(pipe * ~far) + distant + body(turns, speed, far) + wind() + handling()
    running = sum(gate(start, end, rise=0.015, fall=0.0089) for start, end in STRETCHES)
    floor = from_db(-81) * resonate(rng.standard_normal(N), [(60, 0), (800, -6), (8000, -26)])
    return (outdoors * running + floor)[None]


def record(dry):
    """Peaks are rounded off and the treble from 17.8 kHz up is cut."""
    rounded = 1.3 * np.tanh(dry / 1.3)
    return signal.sosfilt(signal.cheby2(14, 70, 17800, fs=SR, output="sos"), rounded)


dry = scene()
out = record(dry)
wav_record(out)
```